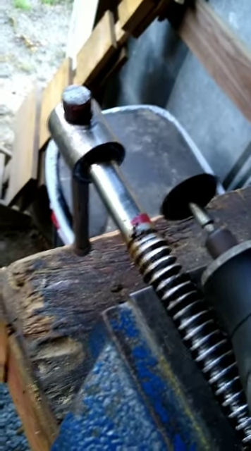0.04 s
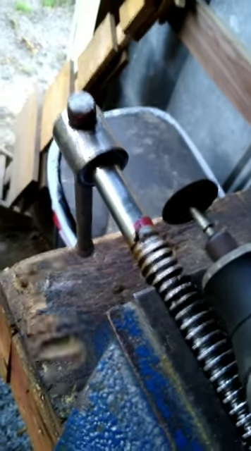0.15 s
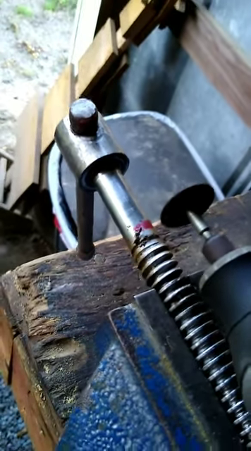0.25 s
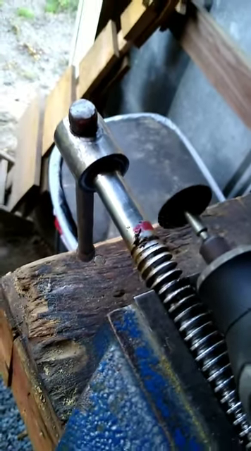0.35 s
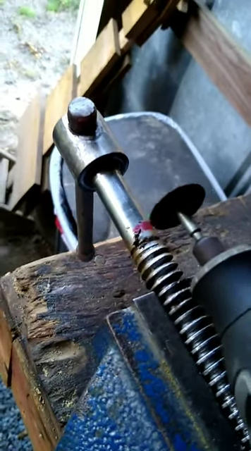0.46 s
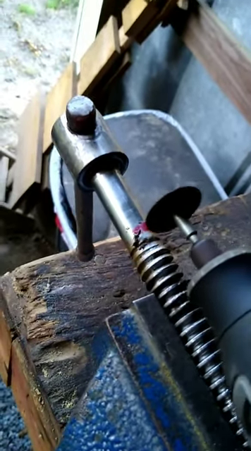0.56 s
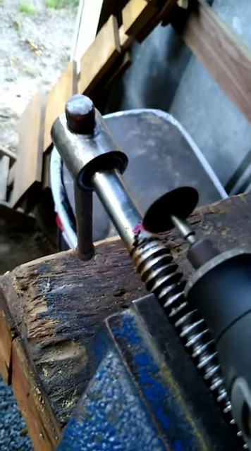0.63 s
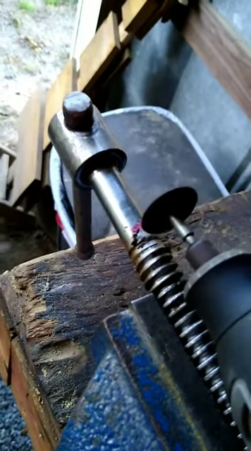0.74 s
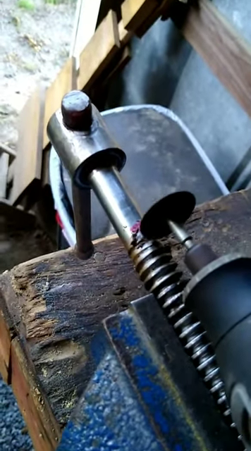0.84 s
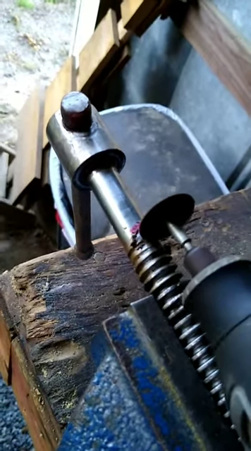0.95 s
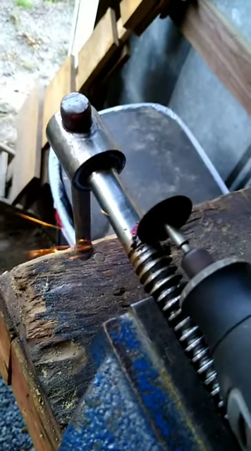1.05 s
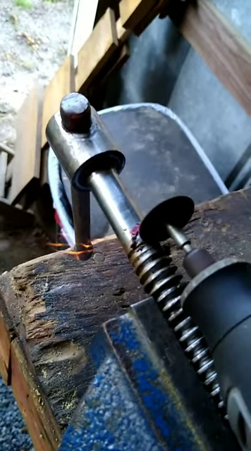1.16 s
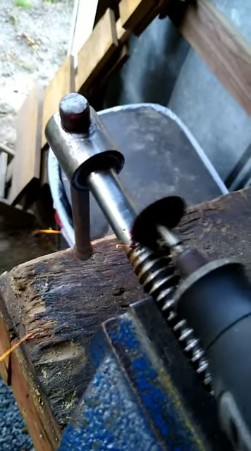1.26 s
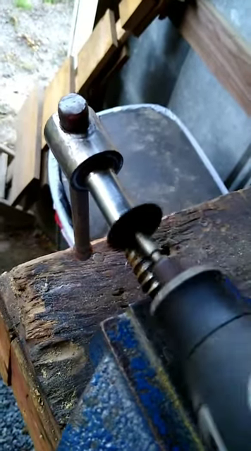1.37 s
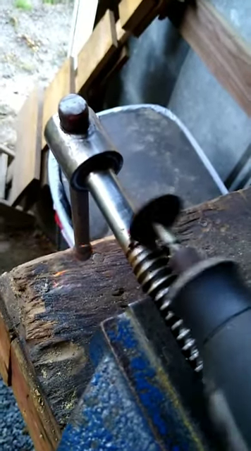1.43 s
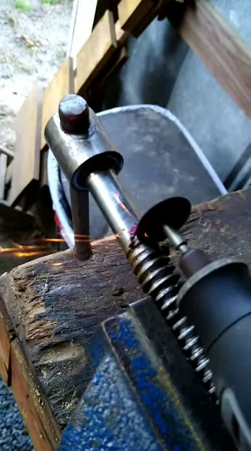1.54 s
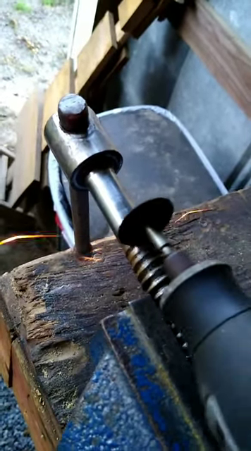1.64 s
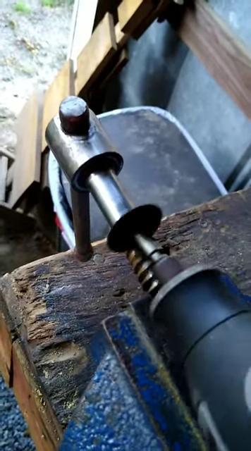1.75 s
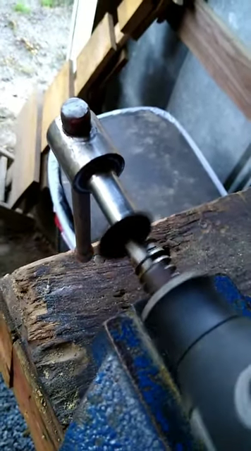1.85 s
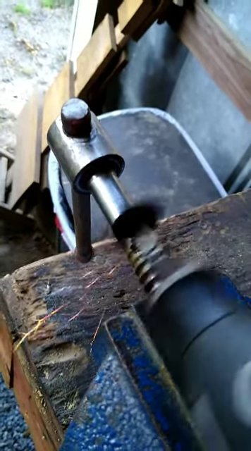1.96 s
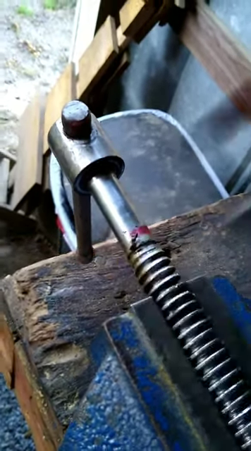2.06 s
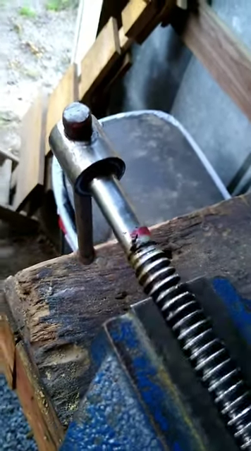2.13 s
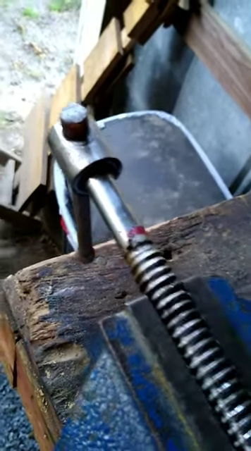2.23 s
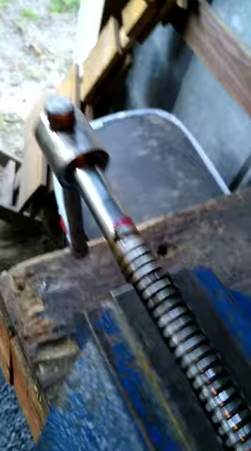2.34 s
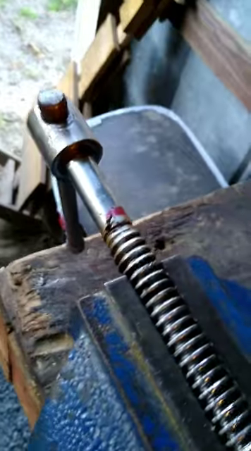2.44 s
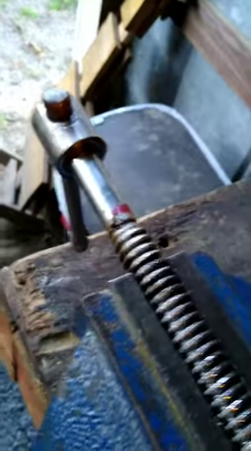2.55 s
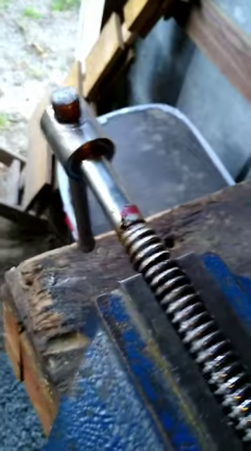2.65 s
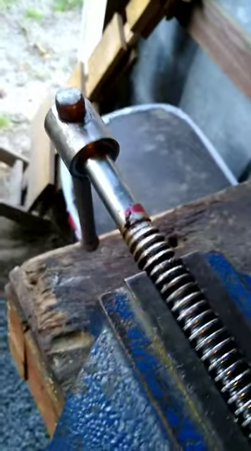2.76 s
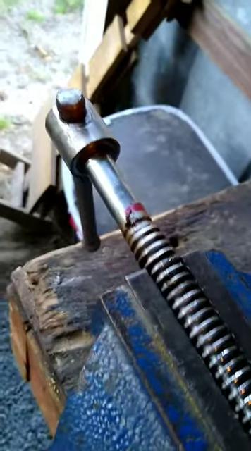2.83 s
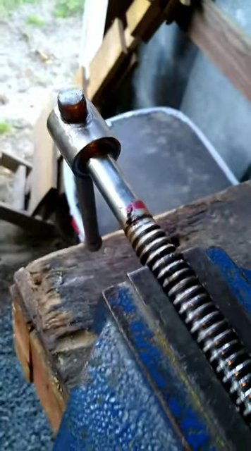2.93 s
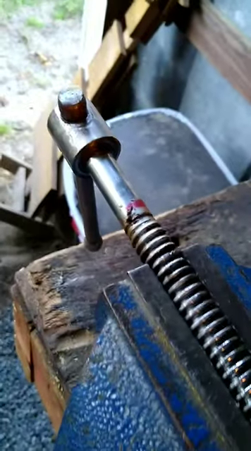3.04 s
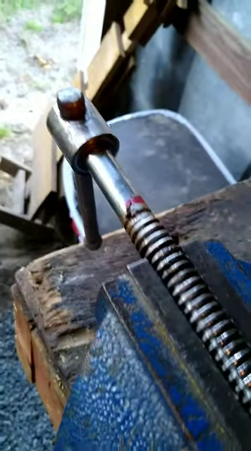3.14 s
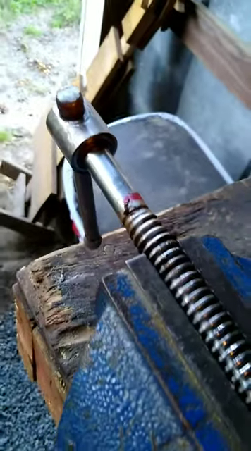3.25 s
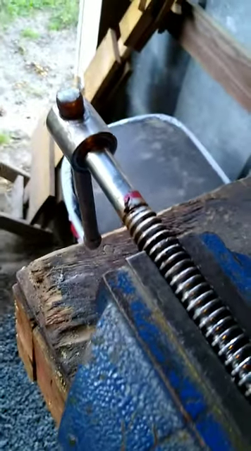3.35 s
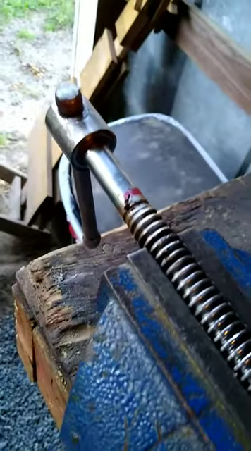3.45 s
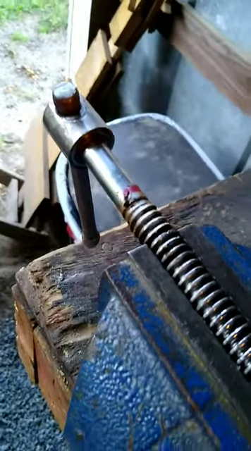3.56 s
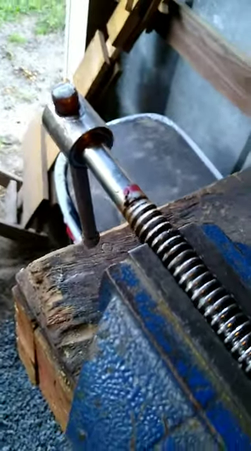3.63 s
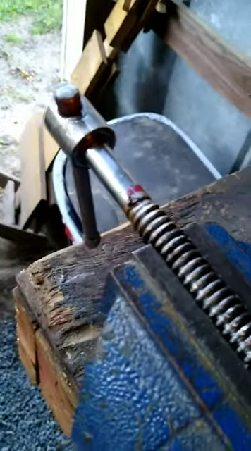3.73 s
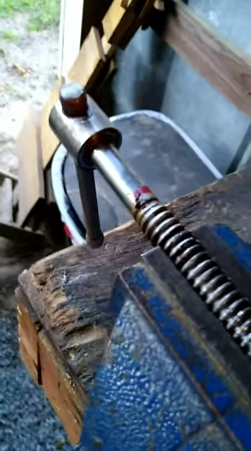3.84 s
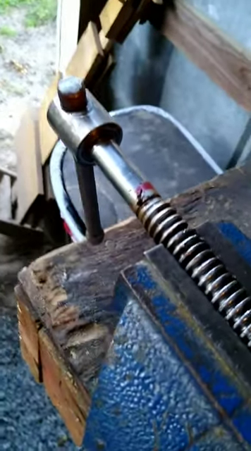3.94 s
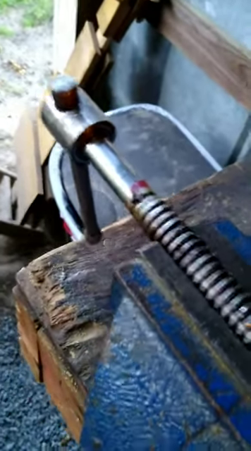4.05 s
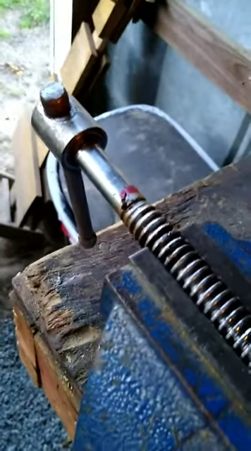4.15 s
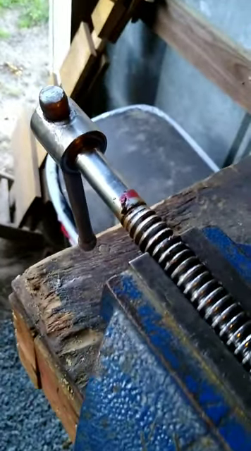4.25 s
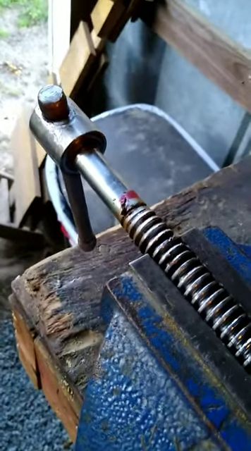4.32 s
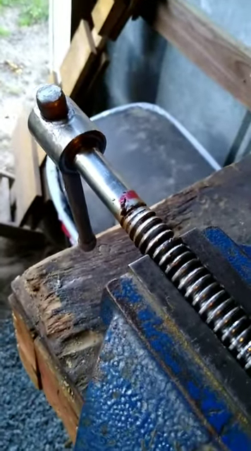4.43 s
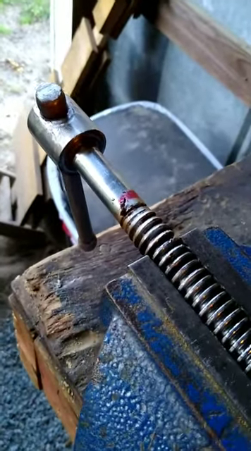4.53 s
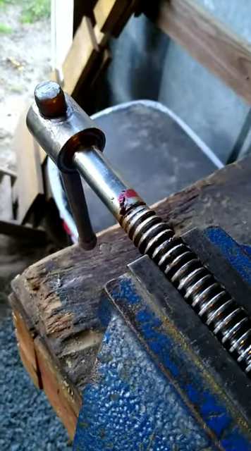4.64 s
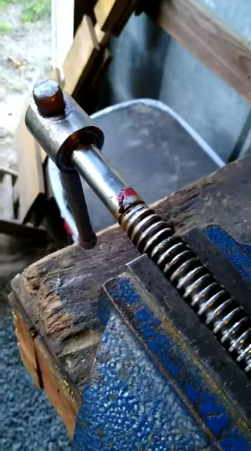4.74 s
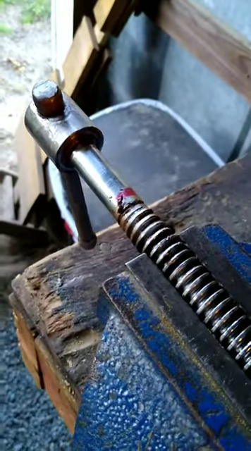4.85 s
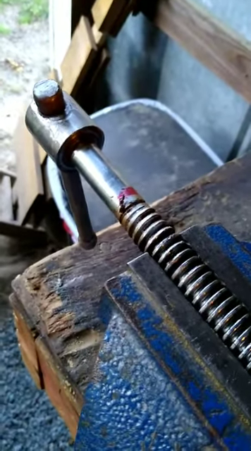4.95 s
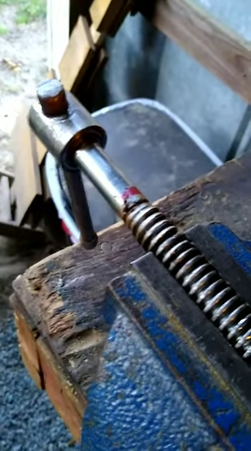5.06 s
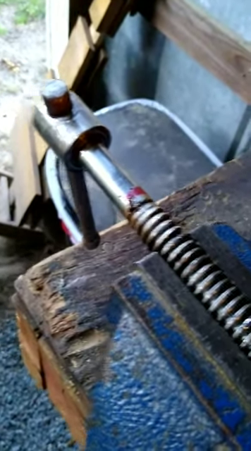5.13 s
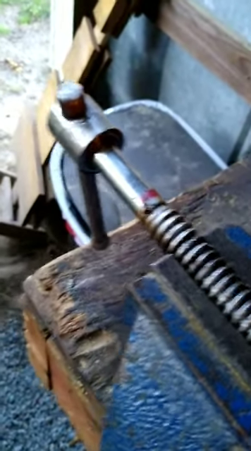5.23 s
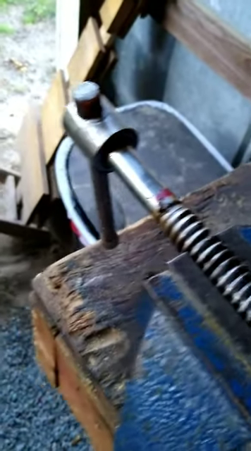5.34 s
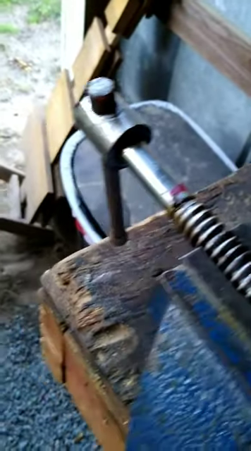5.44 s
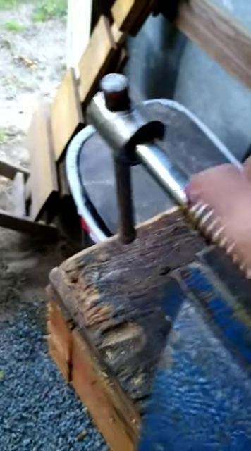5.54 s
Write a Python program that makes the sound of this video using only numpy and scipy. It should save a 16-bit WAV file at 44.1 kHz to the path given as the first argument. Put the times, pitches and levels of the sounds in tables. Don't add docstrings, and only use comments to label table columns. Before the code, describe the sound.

Close stereo microphone at an outdoor-like workshop bench: a handheld rotary tool spins free with hissing, whining fan air. At one second its disc bites steel, shrieking harshly while the motor sags and air thumps the left side. After two seconds it lifts, speeds up and draws away; a low wooden knock bounces briefly, then the whine continues steadily.

```python
import sys
import numpy as np
from scipy import signal
from scipy.fft import rfft, irfft, next_fast_len
from scipy.io import wavfile
from scipy.ndimage import uniform_filter1d, minimum_filter1d

SR = 44100
rng = np.random.default_rng(int(sys.argv[2]) if len(sys.argv) > 2 else 0)


def persist_wave(psi):
    counts = np.round(np.clip(psi, -1, 1) * 32767).astype(np.int16)
    wavfile.write(sys.argv[1], SR, np.atleast_2d(counts).T)


def natural_amplitude(level_db):
    exponent = np.asarray(level_db, float) / 20
    return 10 ** exponent


N = 246519

# (time [s], nearness [dB], vents facing the microphone [dB],
# twist from lower to upper vent [dB])
HAND = [(0, 0.5, -3, -9), (.27, 0, -3, -27), (.48, 0, -0.5, -4.5), (1.0, 1, -3.5, -16),
        (2.16, -0.5, 1.5, -10), (2.32, -1, -2, -21), (2.6, -3.5, -3.5, -33.5), (2.93, -4.5, 0, -11),
        (3.3, -4.5, -2.5, -23), (3.5, -4.5, 0, -13), (3.78, -4, -3.5, -22), (4.0, -4.5, -4.5, -27),
        (4.3, -4.5, -1, -19.5), (4.75, -4.5, -0.5, -18), (5.25, -4.5, -1.5, -18), (5.45, -5, -2, -22),
        (5.59, -5, -6, -32)]
FREE_TURNS_PER_S = 484.2
TOUCH_S, LIFT_S = 1.0, 2.135


def unit(x):
    return x / np.sqrt(np.mean(x ** 2) + 1e-20)


def in_time(rows):
    s, *columns = np.transpose(rows)
    return [np.interp(np.arange(N) / SR, s, c) for c in columns]


def bump(s, half_s, order=2):
    return np.exp(-np.abs((np.arange(N) / SR - s) / half_s) ** order)


def drift(rate, channels=2):
    r = np.exp(-128 * np.pi * rate / SR)
    white = rng.standard_normal((channels, N // 64 + 1002))
    slow = signal.lfilter([1], [1, -2 * r, r * r], white)[:, 1000:]
    return np.array([np.interp(np.arange(N) / 64, np.arange(len(v)), unit(v)) for v in slow])


def noise(alike):
    mid, side = rng.standard_normal((2, N))
    alike = np.clip(alike, 0, 1)
    return np.sqrt(1 + alike) * mid + np.sqrt(1 - alike) * side * np.array([[1], [-1]])


def colour(x, spectrum):
    size = next_fast_len(N)
    hz, db = np.transpose(spectrum)
    bins_hz = np.arange(size // 2 + 1) * SR / size
    gain = natural_amplitude(np.interp(np.log(bins_hz + 1), np.log(hz), db, left=-80, right=-80))
    y = irfft(rfft(x, size) * gain, size)[:, :N]
    return y / np.sqrt(np.mean(y.mean(axis=0) ** 2))


def panned(db, pan_db):
    gains = natural_amplitude(np.reshape([pan_db / 2, -pan_db / 2], (2, -1)))
    return natural_amplitude(db) * gains / np.sqrt(np.mean(gains ** 2, axis=0))


def left_first(x, ms):
    return np.array([x[0], np.roll(x[1], round(ms * SR / 1000))])


def echoed(x, gain, delays_ms, sway_ms):
    out, now = x.copy(), np.arange(N)
    for delay_ms in delays_ms:
        lag = (delay_ms + sway_ms * drift(1.9)[[0, 0]]) * SR / 1000
        out += gain * np.array([np.interp(now - d, now, v, left=0) for d, v in zip(lag, x)])
    return out / np.sqrt(1 + len(delays_ms) * gain ** 2)


def partial(angle, fade_db, fade_rate, wander, wander_rate):
    level = np.sqrt(2) * natural_amplitude(fade_db * drift(fade_rate))
    return level * np.sin(angle + wander * drift(wander_rate) + rng.uniform(0, 7.8, (2, 1)))


def strong_order(rows, angle):
    left_db, right_db, apart = in_time(rows)
    slip = 0.5 * drift(3.5, channels=1) + np.array([apart / 2, -apart / 2])
    return np.sqrt(2) * natural_amplitude(np.array([left_db, right_db]) + 2.04 * drift(7.8)) * np.sin(angle + slip)


def speed():
    # (time [s], speed [turns per s])
    loaded_speed = [(0, 485), (.98, 485.2), (1.06, 482.8), (1.11, 475.5), (1.25, 465.5), (1.33, 433.5),
                    (1.43, 426.2), (1.46, 430), (1.535, 458), (1.555, 461), (1.585, 431), (1.62, 432),
                    (1.7, 444.5), (1.78, 448.2), (1.88, 443.2), (1.94, 449.8), (2.01, 447.8),
                    (2.085, 457.7), (2.103, 456), (2.132, 442), (2.16, 460)]
    spin_up_s = .07
    hunt_turns_per_s, hunt_s, hunt_top_s = .7, .44, 4.24
    t, (last_s, last) = np.arange(N) / SR, loaded_speed[-1]
    free = FREE_TURNS_PER_S + (last - FREE_TURNS_PER_S) * np.exp(-np.maximum(t - last_s, 0) / spin_up_s)
    hunting = hunt_turns_per_s * np.cos(2 * np.pi * (t - hunt_top_s) / hunt_s)
    return np.where(t < last_s, in_time(loaded_speed)[0], free) + hunting


def motor_tones(turn, duck_db, casing_db, jet_db, roar_pan, jet_pan):
    # (multiple of the speed, level over casing hiss [dB])
    commutator = [(2, -9), (4, -20), (5, -21), (8, -23), (10, -21), (7, -19), (11, -19), (12, -4),
                  (13, -20), (14, -22), (15, -12), (16, -21)]
    # (multiple of the speed, level over the jet [dB])
    blades = [(19, -21), (20, -7), (22, -3.5), (23, -5), (24, -12), (25, -29), (26, -12), (27, -9),
              (28, -32), (29, -27)]
    # (order, middle [s], half length [s], change [dB])
    fades = [(1, 1.39, .085, -24), (12, 1.57, .55, -6), (15, 1.57, .55, -8), (2, 1.33, .08, 5),
             (2, 1.1, .1, -4), (27, 2.3, .1, 3), (4, 1.9, .2, 12), (21, 2.65, .25, 3), (21, 2.17, .08, -8),
             (21, 3.15, .2, -5), (21, 4.45, .35, 4), (22, 3.4, .15, 3), (20, 2.35, .1, 5),
             (20, 2.75, .2, 3), (22, 4.4, .25, -5), (12, .5, .5, 4), (12, 2.9, .2, 2), (12, 2.25, .12, 5),
             (12, 4.05, .12, 5), (27, 3.7, .25, 5), (26, 3.5, .3, 3), (23, 4.6, .6, 4)]
    # (time [s], left level [dB], right level [dB], phase between the ports [rad])
    order_3 = [(0, -39, -48, 1.3), (.95, -34.5, -49, 1.5), (1.15, -48, -46, 1), (1.3, -43, -35.5, 1),
               (1.75, -44, -36, 1), (1.95, -54, -46, 1.2), (2.3, -30.5, -49, 1.6), (2.6, -45, -48, 1.7),
               (4, -43.5, -51, 1), (5.59, -40.5, -47, 0.46)]
    order_6 = [(0, -31.5, -40, 0.71), (.5, -35.5, -41, 1), (.98, -31, -54, 2.5), (1.06, -60, -54, 2.7),
               (2.05, -44.5, -50, 2.2), (2.25, -34, -44, 4.6), (2.5, -51, -42, 1.5), (2.9, -44, -35.5, 3.2),
               (3.3, -42, -36.5, 3.8), (3.7, -39.5, -33, 3.55), (4.2, -48, -35.5, 2.5),
               (4.7, -41, -33.5, 3.4), (5.1, -47, -35, 3), (5.59, -46, -35.5, 3.1)]
    order_9 = [(0, -44, -48, 1), (.3, -30, -40, .8), (.5, -48, -51, 2.2), (.7, -31, -49, 2.6),
               (.98, -39, -50, 2.6), (1.06, -45, -52, 1.1), (2.1, -66, -56, 3.1), (2.3, -35, -36, 2.9),
               (2.5, -29, -35, .5), (2.7, -32, -43, 1.4), (2.9, -55, -31, 2), (3.2, -50, -52, 2),
               (3.6, -49, -29, 1.1), (3.9, -39, -32, 2.4), (4.1, -30, -53, 1.5), (4.5, -42.5, -35, 1.5),
               (4.7, -38.5, -47, 4.1), (5.1, -33.5, -57, 1.5), (5.3, -36, -41, 3.6), (5.59, -38, -40, 2.5)]
    order_18 = [(0, -32, -24, 1.5), (.3, -32, -21, 1.5), (.6, -29, -26, .8), (.95, -27, -23, .5),
                (1.1, -38, -33, 1), (1.4, -44, -46, 1.5), (1.9, -39, -32, 1.5), (2.15, -39, -34, 1.5),
                (2.3, -29, -23, 2), (2.5, -30, -25, 1), (2.7, -38, -27, 1.5), (2.9, -37, -33, .8),
                (3.2, -38, -33, 2.8), (3.6, -41, -39, 2), (3.9, -37, -35, 2.8), (4.1, -39, -32, 1),
                (4.3, -38, -38, 2), (4.7, -32, -33, .8), (5.1, -31, -30, 1), (5.59, -38, -31, .5)]
    near_db, facing_db, twist_db = in_time(HAND)

    def fade(order):
        return sum(db * bump(s, half_s, order=4) for k, s, half_s, db in fades if k == order)

    hum_db = -35 + 1.39 * near_db + 0.65 * duck_db + fade(1)
    out = np.sqrt(2) * natural_amplitude(hum_db + 2.0 * drift(29.0, channels=1)) * np.sin(turn) * np.ones((2, 1))
    levels = [(21, -21.5 + 0.2 * near_db + 0.5 * facing_db + 0.39 * twist_db + 0.31 * duck_db)]
    for order, db in commutator:
        load_db = -0.45 * duck_db * (order < 4)
        levels.append((order, db + casing_db - 8.5 + load_db))
    for order, db in blades:
        levels.append((order, db + jet_db + 0.5 - 0.21 * near_db + 2.8 * duck_db))
    shaft = turn + 0.028 * drift(3.8, channels=1)
    for order, level_db in levels:
        whine = partial(order * shaft, fade_db=2.0, fade_rate=6, wander=.5, wander_rate=5)
        out += panned(level_db + fade(order), roar_pan if order < 4 else jet_pan) * whine
    for order, rows in [(3, order_3), (6, order_6), (9, order_9), (18, order_18)]:
        out += strong_order(rows, order * shaft)
    return out


def vent_air(turn, sag, duck_db, casing_db, jet_db, roar_pan, jet_pan):
    # (frequency [Hz], level [dB per Hz])
    roar = [(310, -27), (520, -14), (579, -14.5), (967, 5), (1210, 3), (1330, -5.5), (1600, -5),
            (2080, -13.5), (3520, -120)]
    casing = [(1200, -6), (1600, 0), (2200, 1), (2900, -0.5), (3600, -2), (4300, -1), (5200, -2), (6200, 2),
              (7100, -3.5), (7700, 3.5)]
    upper_jet = [(9000, -44), (9500, -2.5), (10300, 9.5), (11000, 5), (11700, -8), (12300, -12)]
    lower_jet = [(7000, -10.5), (7600, -18), (8300, -5.5), (8600, -5), (9400, -2), (9900, -29)]
    top_hiss = [(6650, -19.5), (11300, 0), (12200, -1), (13600, -2.5), (14400, -2.5), (15300, -9),
                (15800, -14)]
    vents_ms = -.2
    near_db, facing_db, twist_db = in_time(HAND)
    roar_db = -30.5 + 1.04 * near_db + 0.54 * duck_db + 1.7 * sag
    lower_db = -22 + 1.92 * near_db + 1.82 * facing_db - 0.45 * twist_db
    top_db = -23 + 1.09 * near_db + 0.071 * facing_db
    beat = 1 + .2 * np.sin(turn)

    def throbbing(alike, ms, spectrum):
        return colour(left_first(noise(alike), ms) * beat, spectrum)

    out = panned(roar_db + 2.0 * drift(4.1), roar_pan) * colour(noise(0.55), roar)
    hiss = echoed(throbbing(0.09, vents_ms / 2, casing), gain=0.98, delays_ms=[3.7, 8.9], sway_ms=0.074)
    out += panned(casing_db - 2.5 + 1.25 * drift(9.0), -0.28) * hiss
    out += panned(jet_db + 0.63 + duck_db + 0.12 * drift(4.0), jet_pan) * throbbing(1.0, vents_ms, upper_jet)
    out += panned(lower_db - 7.0 + duck_db + 1.0 * drift(30), jet_pan) * throbbing(0.1, vents_ms, lower_jet)
    out += panned(top_db + duck_db + 1.0 * drift(5.2), -0.16) * throbbing(0.11, vents_ms, top_hiss)
    return out


def motor(turn, sag, duck_db):
    near_db, facing_db, twist_db = in_time(HAND)
    casing_db = -26 + near_db + 0.78 * duck_db + 5.2 * sag - 3.9 * bump(2.093, 0.12, order=4)
    jet_db = -20.5 + 1.66 * near_db + facing_db + 0.17 * twist_db
    roar_pan = -7.5 + 1.2 * near_db - 3.5 * sag
    jet_pan = -9.5 - 0.9 * near_db
    out = motor_tones(turn, duck_db, casing_db, jet_db, roar_pan, jet_pan)
    out += vent_air(turn, sag, duck_db, casing_db, jet_db, roar_pan, jet_pan)
    return signal.sosfilt(signal.butter(4, 230, "high", fs=SR, output="sos"), out)


def low_air(touching):
    # (frequency [Hz], level [dB per Hz])
    hum_colour = [(150, -62), (200, -24), (280, -10.5), (400, -5), (460, 5), (560, -13)]
    shed_colour = [(20, -10), (60, 1), (150, -1), (260, -9)]
    wind_colour = [(20, -16), (40, -38), (80, 5), (105, 10.5), (135, 0.5), (250, -2.5), (450, -5.5)]
    # (middle [s], half length [s], peak [dB])
    gust_times = [
        (1.05, 0.035, -56),
        (1.443, 0.019, -46),
        (1.613, 0.063, -46.5),
        (3.95, 0.07, -72),
        (2.133, 0.03, -48),
        (2.264, 0.19, -50.5),
    ]
    near_db = in_time(HAND)[0]
    gusts = natural_amplitude(-54.5) * touching + sum(natural_amplitude(db) * bump(s, half_s) for s, half_s, db in gust_times)
    wind = gusts * panned(2.0 * drift(3.7), 42.0) * colour(noise(0.44), wind_colour)
    hum_db = -50 + 1.9 * near_db + 2.0 * drift(10.0, channels=1)
    hum = natural_amplitude(hum_db) * colour(noise(0.92), hum_colour)
    shed_db = -85 - 5.5 - 3.3 * near_db + 4.8 * drift(3.3, channels=1)
    return wind + hum + natural_amplitude(shed_db) * colour(noise(1.0), shed_colour)


def disc(turn, touching, since_lift):
    # (time [s], shriek [dB], lower rim [dB], upper rim [dB])
    pressure = [
        (1.0, -20, 6.5, 6),
        (1.014, -22.5, -4, -1),
        (1.416, -16.5, -2, -5.5),
        (1.48, -23.5, -0.5, 1),
        (1.584, -18, -2, -6.5),
        (1.788, -20.5, -2, 0),
        (2.07, -21, 0, 4.5),
        (2.13, -17, 0, -2),
        (2.135, -22, -13, -2),
    ]
    # (time [s], level change [dB])
    skips = [(1.008, 14), (1.026, -7), (1.042, 1), (1.074, 2), (1.11, 2.5), (1.135, 0), (1.163, -4),
             (1.19, 4.5), (1.208, -3), (1.24, 3), (1.275, 5), (1.3, 0), (1.33, -0.5), (1.365, -1),
             (1.4, -3), (1.456, -3), (1.49, 5.5), (1.515, 2), (1.55, 3), (1.6, 5), (1.629, 5), (1.66, 5),
             (1.695, 1.5), (1.74, -2.5), (1.78, -1), (1.83, 0), (1.885, -2), (1.915, 0), (1.945, -1),
             (1.97, 7.5), (2.0, 0), (2.03, -3), (2.055, 4), (2.095, -2), (2.115, 1)]
    # (frequency [Hz], level [dB per Hz])
    low_colour = [(7800, -11), (8300, -4.5), (9000, -4.5), (9700, 0), (10300, 5.5), (10900, 6), (11500, -1),
                  (12000, -11)]
    high_colour = [(10800, -42), (11500, -7), (12000, 0), (12400, 2), (12800, -2.5), (13100, -3),
                   (13500, -30)]
    edge_colour = [(12700, -11), (13100, 2), (13800, 4.5), (14400, 3.5), (14800, 1), (15200, 5),
                   (15600, -15), (16000, -21)]
    screw_colour = [(2000, -6), (2700, -4), (3500, -11), (4400, 2.5), (5200, 2), (6000, 1.5), (6900, 7),
                    (7300, -15), (7700, -25)]
    flutter_colour = [(1200, -5), (3000, -15), (5500, 5.5), (7500, -13), (8500, -5), (9800, 12),
                      (11000, -13), (12000, -20)]
    shriek_db, lower_db, upper_db = in_time(pressure)
    shriek_db = shriek_db + 7 + sum(db * bump(s, 0.0092) for s, db in skips)
    rocking = drift(6.6, channels=1)[0]
    lower_db = lower_db + 0.15 + 2.5 * rocking
    pan_db = 3.5 + 2.8 * rocking
    orders = [partial(k * turn, fade_db=4.0, fade_rate=24, wander=.75, wander_rate=14) for k in range(3, 38)]
    grit = unit(sum(orders))
    grit = unit(grit + 1.8 * grit[0])
    scrape = noise(0.077) * (1 + 3.06 * np.sin(turn + 0.88 * drift(7.8)))
    rasp = grit + natural_amplitude(-12) * scrape
    contact = rasp * natural_amplitude(1.5 * drift(39, channels=1)) * touching
    high = panned(shriek_db, pan_db) * colour(contact, high_colour)
    edge = panned(shriek_db + upper_db - 2.5, pan_db + 0.1) * colour(contact, edge_colour)
    low = panned(shriek_db + lower_db, pan_db - 7.5) * colour(contact, low_colour)
    body = panned(shriek_db - 14.0, -13.0) * colour(grit * touching, screw_colour)
    cut = left_first(high + body, .317) + left_first(edge, .295) + left_first(low, .14)
    run_up = (1 - np.exp(-since_lift / 0.024)) * np.exp(-since_lift / 0.21)
    flutter = run_up * panned(-23, 1.0) * colour(grit, flutter_colour)
    return flutter + cut * np.sqrt(np.mean(touching ** 2))


def puffs():
    # (time [s], peak [dB], frequency [Hz])
    puff_times = [
        (1.44, -37, 120),
        (1.455, -25, 150),
        (1.55, 1.5, 230),
        (1.632, -13, 164),
        (1.644, -26, 130),
        (1.655, -25, 70),
        (2.126, -13.5, 236),
    ]
    out, t = np.zeros((2, N)), np.arange(N) / SR
    for s, db, hz in puff_times:
        x = (t - s) * hz * 2 * np.pi - np.pi
        out[0] -= natural_amplitude(db) * np.sin(x + .5) * np.exp(-(x / 1.7) ** 2)
    return out


def bench():
    # (time [s], peak [dB], contact frequency [Hz])
    knocks = [
        (2.7463, -6.5, 600),
        (2.752, 0, 560),
        (2.7728, 1, 170),
        (2.7825, -10, 170),
        (2.7955, -10, 150),
        (2.8005, -10, 200),
        (2.811, -16, 250),
        (2.827, -16, 250),
        (2.865, -21, 130),
    ]
    # (frequency [Hz], level [dB], decay by 60 dB [s])
    plank_modes = [(112, -16, 0.25), (150, 2.5, 0.16), (190, -4, 0.13), (233, -5, 0.06), (260, -7, 0.05),
                   (306, 8, 0.03), (384, 1, 0.05), (610, -9, 0.03)]
    out = np.zeros(N)
    for s, db, contact_hz in knocks:
        click = np.zeros(SR // 3)
        click[0] = natural_amplitude(db - 15.0)
        click = signal.sosfilt(signal.butter(2, contact_hz, fs=SR, output="sos"), click)
        at = round(s * SR)
        for (hz, mode_db, t60), own_db in zip(plank_modes, rng.normal(0, 5.0, len(plank_modes))):
            r, w = natural_amplitude(-60 / (t60 * SR)), 2 * np.pi * hz / SR
            ringing = signal.lfilter([0, np.sin(w)], [1, -2 * r * np.cos(w), r * r], click)
            out[at:at + len(click)] -= natural_amplitude(mode_db + own_db) * ringing
    out = signal.sosfilt(signal.butter(2, 150, "high", fs=SR, output="sos"), out)
    return out * natural_amplitude(np.array([[-.7], [.7]]))


def bench_tail():
    after = np.arange(N) / SR - 2.75
    fading = (after > 0) * natural_amplitude(-31.0 - 60 * np.maximum(after, 0) / 0.76)
    spectrum = [(40, -25), (90, -6), (150, -1), (300, -0.5), (420, -14), (700, -10)]
    return fading * colour(noise(0.99), spectrum)


def scene():
    turns = speed()
    turn = 2 * np.pi * np.cumsum(turns) / SR
    sag = 10 * (1 - turns / FREE_TURNS_PER_S)
    touching, = in_time([(TOUCH_S - .005, 0), (TOUCH_S + 0.045, 0.88),
                         (LIFT_S - .005, 0.8), (LIFT_S + 0.0019, 0)])
    since_lift = np.maximum(np.arange(N) / SR - LIFT_S, 0)
    gain_back_s = 0.035
    duck_db = -16.0 * np.where(since_lift > 0, 0.79 * np.exp(-since_lift / gain_back_s), touching)
    tool = motor(turn, sag, duck_db) + low_air(touching) + disc(turn, touching, since_lift)
    return tool + puffs() + bench() + bench_tail()


def top_cut(x):
    return signal.sosfilt(signal.butter(12, 15750, fs=SR, output="sos"), x)


def record(dry):
    room = np.minimum(1, .86 / (np.abs(dry).max(axis=0) + 1e-9))
    limited = dry * uniform_filter1d(minimum_filter1d(room, size=90), size=90)
    mix = signal.sosfilt(signal.cheby2(14, 60, 16400, fs=SR, output="sos"), limited)
    return top_cut(mix)


dry = scene()
out = record(dry)
persist_wave(out)
```